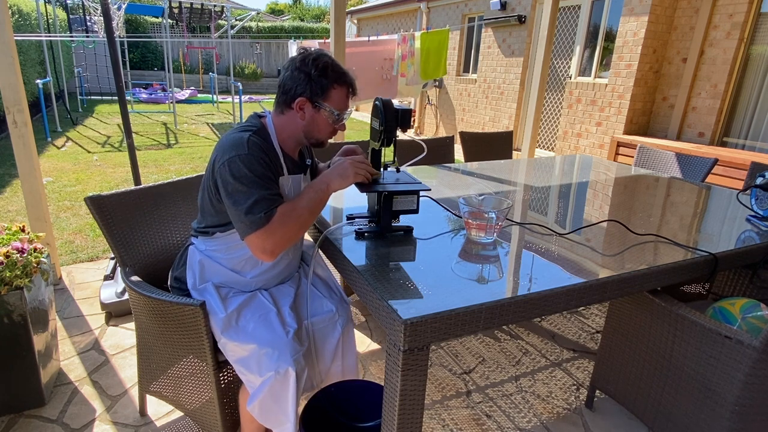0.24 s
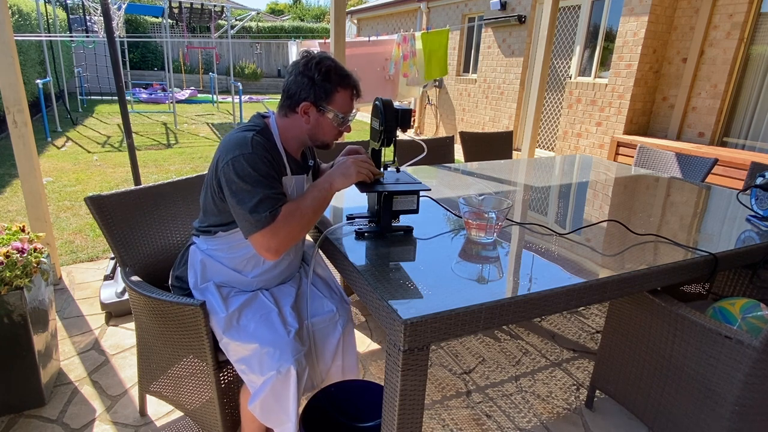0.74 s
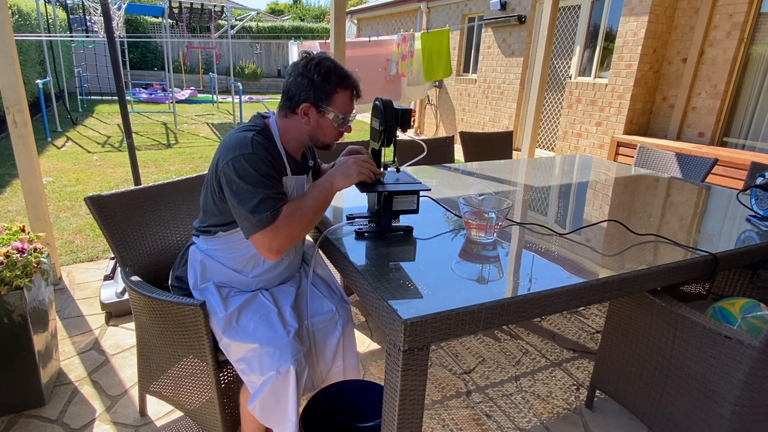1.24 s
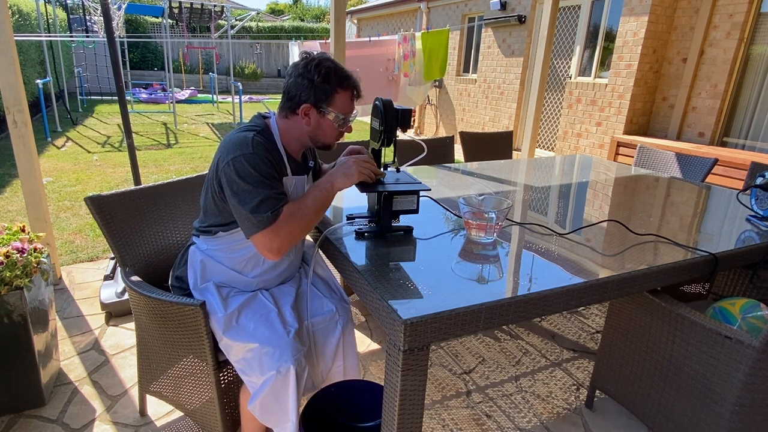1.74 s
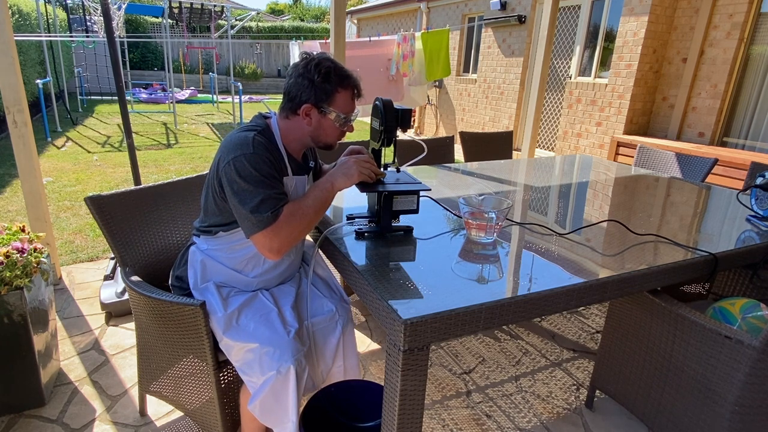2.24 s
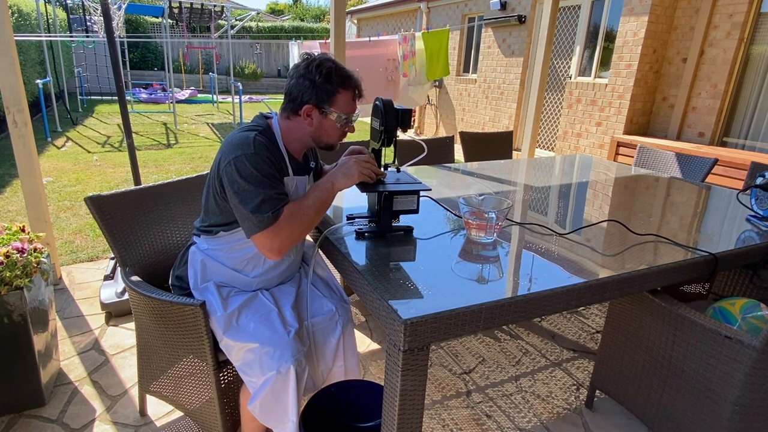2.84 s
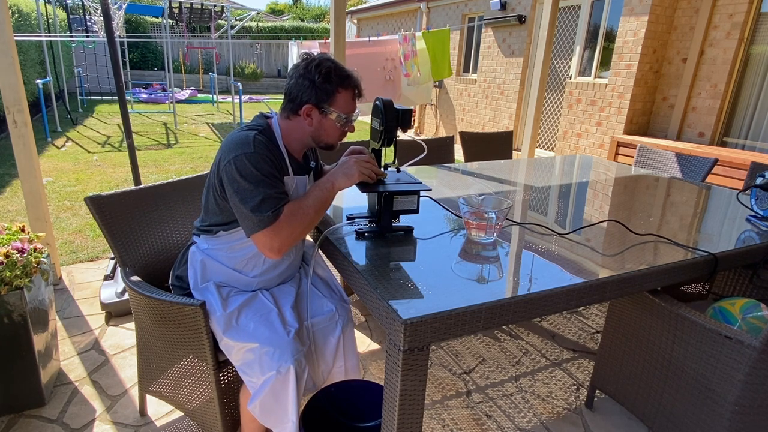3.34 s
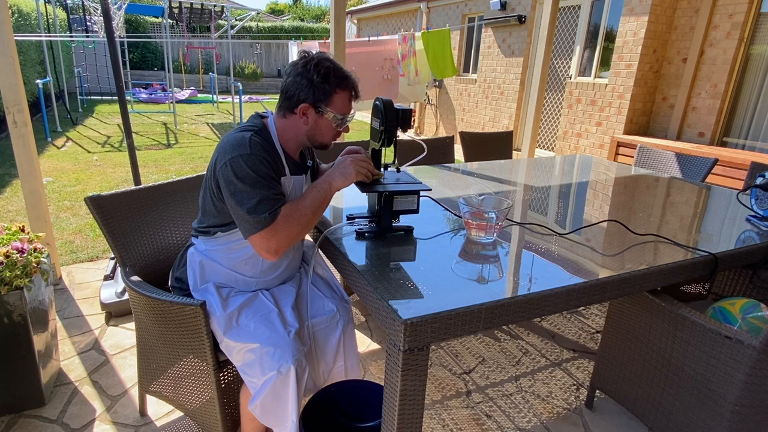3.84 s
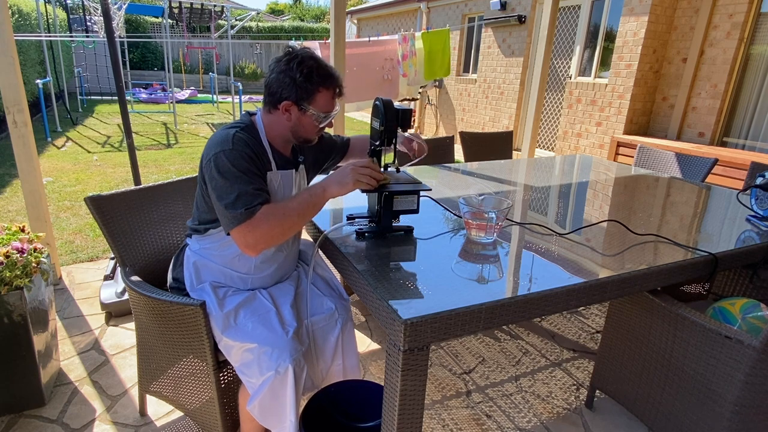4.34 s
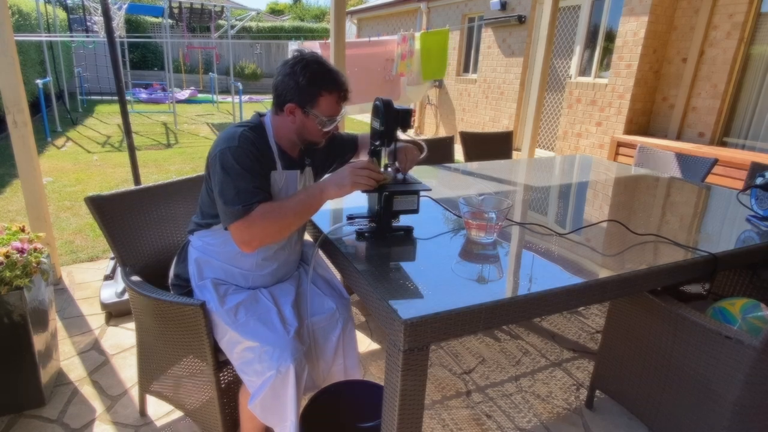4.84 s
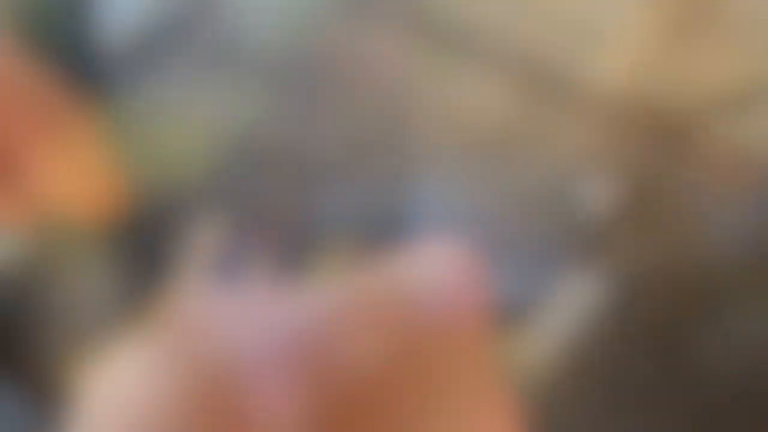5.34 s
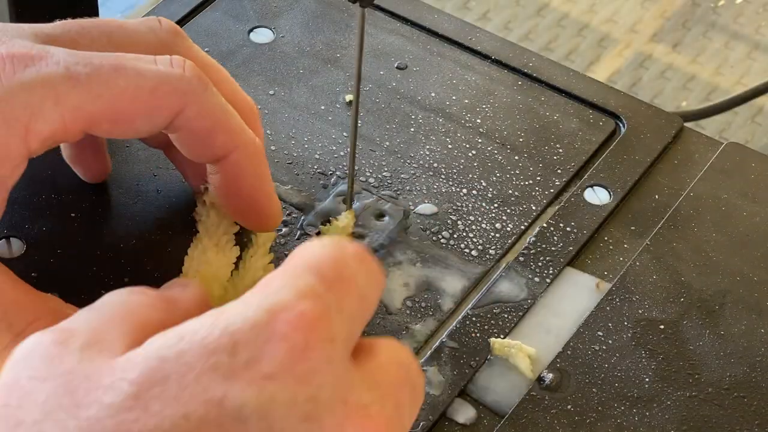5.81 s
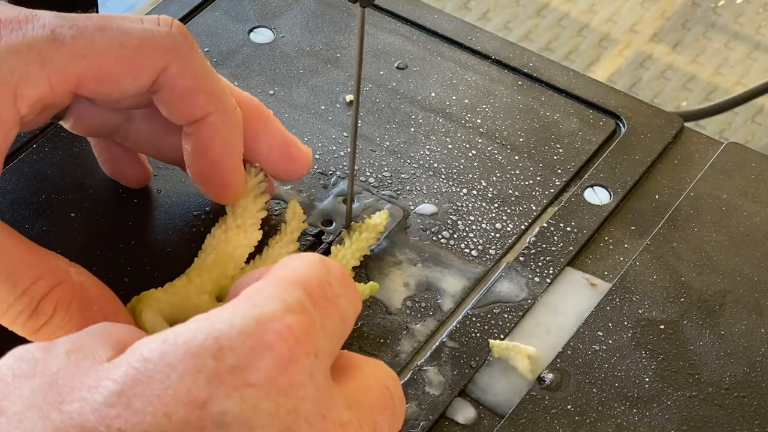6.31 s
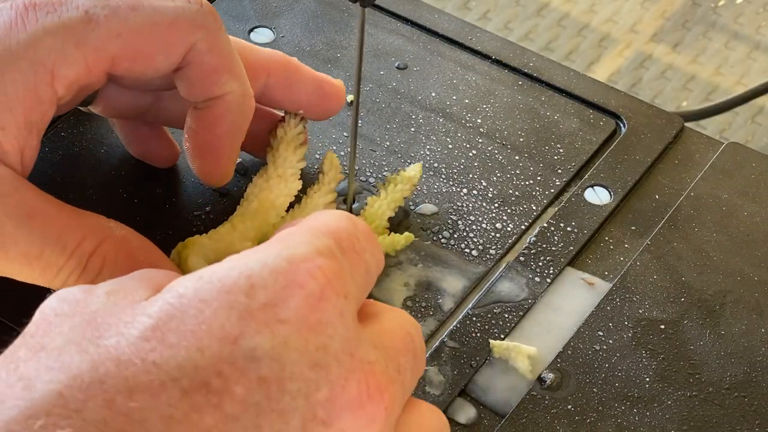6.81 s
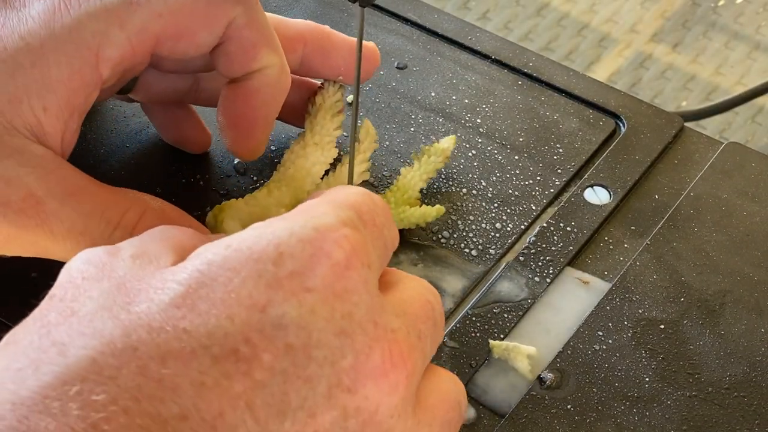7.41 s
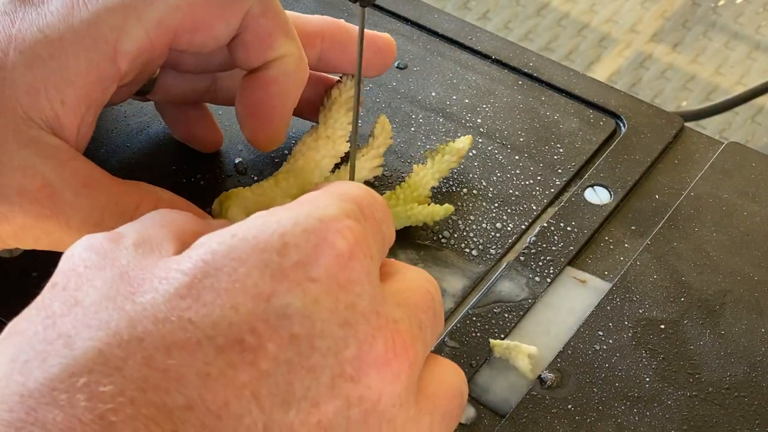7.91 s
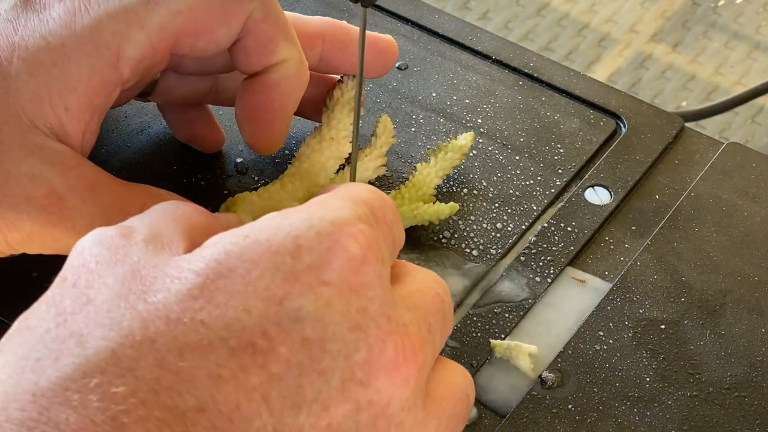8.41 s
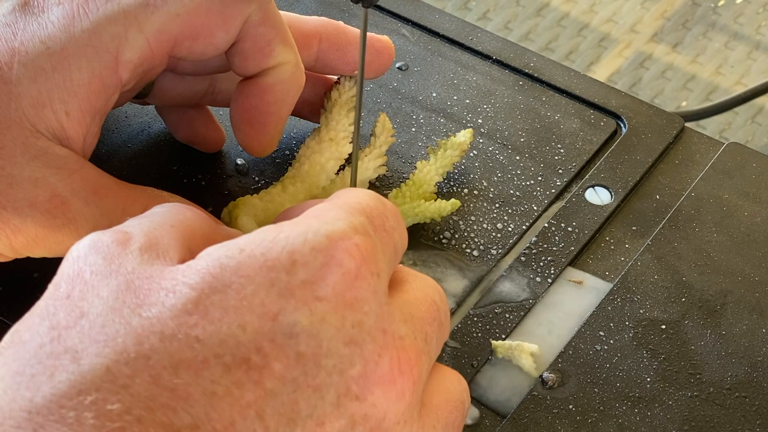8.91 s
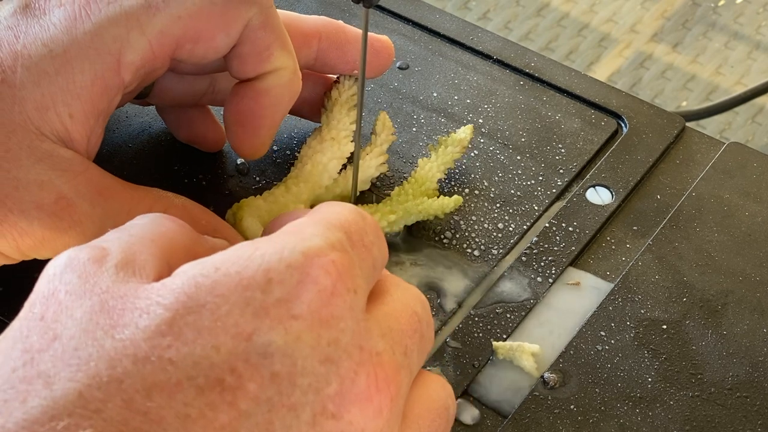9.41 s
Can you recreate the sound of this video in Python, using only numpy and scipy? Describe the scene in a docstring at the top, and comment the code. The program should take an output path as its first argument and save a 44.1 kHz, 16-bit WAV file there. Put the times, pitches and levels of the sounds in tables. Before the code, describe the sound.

On an outdoor patio, a small wet band saw runs with a pulsing, rattling drone. It bites into a branch of coral, grinding harder with a bright fizz and ringing steel, then runs free with scattered gritty ticks. The sound blends into a duller close-up of the same saw. Fingers bump the microphone softly, and a second cut builds, with rhythmic metallic pings and faint thin squeaks.

```python
"""A gritty, pulsing grind: a small wet band saw on a patio table cuts a branch of coral and runs free,
then, heard close up, starts a second cut. The blade loop laps about 11.5 times a second,
shaking the frame in the same way and scraping at the same places on every lap. Diamond grit
grinds the wet stone, steel rings, the motor hums underneath, and fingers bump the microphone."""
import sys
import numpy as np
from scipy import signal
from scipy.fft import rfft, irfft, next_fast_len
from scipy.io import wavfile
from scipy.ndimage import uniform_filter1d, map_coordinates

SR = 44100
rng = np.random.default_rng(int(sys.argv[2]) if len(sys.argv) > 2 else 0)


def bounce(signal):
    """Save signal as a 16-bit WAV file at the path given by the first command-line argument."""
    frames = np.transpose(np.atleast_2d(signal))
    limited = np.clip(frames, -1, 1)
    pcm = np.round(limited * 32767).astype(np.int16)
    wavfile.write(sys.argv[1], SR, pcm)


N = 426006
TIME = np.arange(N) / SR
FREE_S, FREE_FADE_S = 3.72, 0.45  # the branch has parted and the blade runs free
NEAR_S, NEAR_FADE_S = 5.334, 0.7  # the distant saw crossfades into the saw heard close up

# broad colour of the free-running saw: f/Hz, level/dB
FREE_SAW_COLOUR = [(200, -13), (290, -12), (350, -1), (600, -6), (1350, -3), (1750, 3.5), (2100, -18),
                   (3500, -10), (4500, -10), (6000, -16.5), (9000, -19), (11000, -30), (15500, -37)]
# its resonances: f/Hz, width/Hz, lift/dB
FREE_SAW_MODES = [(488, 126, 14), (725, 140, 7), (828, 130, 8.3), (1030, 110, 11.3), (1410, 60, 6),
                  (2320, 170, 9), (2870, 130, 6.5), (3140, 150, 10), (5540, 260, 5)]
# bumps on the microphone: t/s, relative level/dB, f/Hz
MIC_BUMPS = [(5.582, -25, 210), (5.931, -25.5, 220), (6.129, -29, 140), (6.274, -33, 150),
             (6.356, -19.5, 225), (6.386, -22, 175), (6.606, -28, 150), (6.652, -28, 180),
             (6.779, -28, 130), (6.83, -23.5, 125)]


def amp(db):
    """Decibels to gain."""
    return 10 ** (np.asarray(db) / 20)


def unit(x):
    """Scaled to rms 1."""
    return x / np.sqrt(np.mean(x ** 2) + 1e-20)


def wobble(rate):
    """A smooth random curve, rate knots a second."""
    return map_coordinates(rng.standard_normal(int(N * rate / SR) + 4), [TIME * rate], order=2)


def after(s, fade):
    """Rises from 0 to 1 around time s."""
    return np.clip((TIME - s) / fade + .5, 0, 1)


def swell(s, length):
    """Rises to 1 at time s and falls again."""
    return np.exp(-((TIME - s) / length) ** 2)


def band(x, lo_hz, hi_hz):
    """The part of x between two steep edges."""
    size = next_fast_len(N + 8192)
    hz = np.fft.rfftfreq(size, 1 / SR) + 1
    cut = np.sqrt((1 + (lo_hz / hz) ** 20) * (1 + (hz / hi_hz) ** 20))
    return irfft(rfft(x, size) / cut, size)[:N]


def ringing(colour, modes=(), size=8192):
    """Causal impulse response of a body with a broad colour and resonances."""
    hz = np.fft.rfftfreq(size, 1 / SR) + 1
    colour_hz, colour_db = np.transpose(colour)
    broad_db = np.interp(np.log(hz), np.log(colour_hz), colour_db)
    peaks_db = sum(lift / (1 + (2 * (hz - centre) / width) ** 2) for centre, width, lift in modes)
    cepstrum = irfft(np.log(amp(broad_db + peaks_db)))
    cepstrum[1:size // 2] *= 2  # fold to minimum phase
    cepstrum[size // 2 + 1:] = 0
    return irfft(np.exp(rfft(cepstrum)))


def through(x, response):
    """x played through an impulse response."""
    return signal.fftconvolve(x, response)[:N]


def grit(rate, scatter_db, wash):
    """Tiny impacts of uneven size, rate a second, on a wash of finer ones."""
    sizes = amp(scatter_db * np.clip(rng.standard_normal(N), -2, 2)) * rng.choice([-1, 1], N)
    impacts = unit(sizes * (rng.random(N) < rate / SR))
    return unit(impacts + wash * rng.standard_normal(N))


def struck(times, db, modes, t60, vary_db):
    """Steel struck at the given times; each blow shares itself anew among the modes."""
    t, sound = np.arange(SR // 10) / SR, np.zeros(N + SR)
    hz, mode_db = np.transpose(modes)[:, :, None]
    rings = amp(mode_db - 60 * t / t60) * (1 - np.exp(-t / .0012))
    scatter = rng.standard_normal((len(times), 2, len(modes), 1))
    for s, blow_db, (size, detune) in zip(times, db, scatter):
        tones = np.sin(2 * np.pi * (hz + 14 * detune) * t)
        sound[int(s * SR):][:len(t)] += (amp(blow_db + vary_db * size) * rings * tones).sum(0)
    return sound[:N]


def patio(x, wet_db, t60):
    """Table top, wall and roof add a short diffuse answer."""
    t = np.arange(SR // 3) / SR
    tail = rng.standard_normal(len(t)) * amp(-60 * t / t60) * (t > .003)
    return x + amp(wet_db) * through(x, tail / np.linalg.norm(tail))


def rumble(load, level_db, load_db, near_db, handled_db):
    """Low rumble of table and air, stronger under load and while the microphone is handled."""
    # rumble spectrum: f/Hz, level/dB
    colour = [(20, -28), (50, -17.5), (80, -12), (108, -4), (160, -10.5), (260, -6.5), (500, -25.5),
              (3000, -68)]
    handled = after(MIC_BUMPS[0][0], 0.7) - after(MIC_BUMPS[-1][0] + 0.21, 0.26)
    db = level_db + load_db * load + near_db * after(NEAR_S, NEAR_FADE_S) + handled_db * handled
    return amp(db) * unit(through(rng.standard_normal(N), ringing(colour)))


def handling(bump_db, rub_db):
    """Soft, dull thuds and rubs of fingers on the microphone body."""
    # finger slides: t/s, swell/s, relative level/dB
    slides = [(5.55, .05, -44), (6.825, .04, -36.5)]
    # their spectrum: f/Hz, level/dB
    colour = [(20, -16), (60, -7), (140, 1), (240, -6), (330, -10), (600, -46)]
    t, thuds = np.arange(SR // 8) / SR, np.zeros(N)
    decay = amp(-60 * t / .038) * (1 - np.exp(-t / .003))
    for s, db, hz in MIC_BUMPS:
        thuds[int(s * SR):][:len(t)] += amp(db) * decay * np.sin(2 * np.pi * hz * t)
    sliding = sum(amp(db) * swell(s, length) for s, length, db in slides)
    friction = unit(through(rng.standard_normal(N), ringing(colour)))
    return amp(bump_db) * band(thuds, 20, 340) + amp(rub_db) * sliding * friction


def motor(laps_per_s, whirr_db, near_db, hum_db):
    """A wavering whirr geared to the blade, and the fourth multiple of the mains."""
    turns_per_lap, hum_hz = 10.7, 199.2
    whirr = np.sin(2 * np.pi * np.cumsum(turns_per_lap * laps_per_s + 4 * wobble(14)) / SR)
    whirr *= amp(whirr_db + near_db * after(NEAR_S, NEAR_FADE_S) + 3.1 * wobble(6))
    return whirr + amp(hum_db + wobble(3)) * np.sin(2 * np.pi * hum_hz * TIME)


def crackle(level_db, start_s, end_s):
    """A brief, high, uneven crackle as the coral shifts on the wet table."""
    # broad colour of wet coral: f/Hz, level/dB
    colour = [(3500, -38), (5800, -3), (9000, -11), (15000, -11)]
    # its resonances: f/Hz, width/Hz, lift/dB
    modes = [(7000, 700, 8.2), (10100, 580, 6)]
    sputter = grit(rate=1500, scatter_db=4, wash=0.34) * amp(3.1 * wobble(130))
    ring = band(through(sputter, ringing(colour, modes)), 4500, 16000)
    return amp(level_db) * unit(ring) * (after(start_s, 0.01) - after(end_s, 0.034))


def chips(level_db, rate, scatter_db, t60, start_s, end_s):
    """The parted coral brushes the free blade and sheds small, bright ticks at random."""
    t = np.arange(SR // 10) / SR
    ticks = (rng.random(N) < rate / SR) * amp(scatter_db * np.clip(rng.standard_normal(N), -1.5, 1.5))
    envelope = through(ticks, amp(-60 * t / t60) * (1 - np.exp(-t / 0.0027)))
    brushing = after(start_s, .1) - after(end_s, 0.11)
    ring = through(rng.standard_normal(N), ringing(FREE_SAW_COLOUR, FREE_SAW_MODES))
    return amp(level_db) * envelope * brushing * unit(band(ring, 7200, 17000))


def squeals(gain_db, sputter_db):
    """The blade squeaks thinly and in sputters as it grazes the coral, and rasps as it sinks in."""
    # squeaks and rasps of the second cut: t/s, swell/s, f/Hz, width/Hz, relative level/dB
    squeaks = [(7.7, .08, 11330, 260, -62), (7.95, .07, 11400, 420, -54), (8.25, .25, 11400, 260, -60),
               (9.35, .3, 12500, 300, -58), (9.45, .2, 6250, 650, -44.5)]
    sound = np.zeros(N)
    for s, length, hz, width, db in squeaks:
        ring = signal.lfilter(*signal.iirpeak(hz, hz / width, SR), rng.standard_normal(N))
        sound += amp(db) * swell(s, length) * unit(ring)
    return amp(gain_db) * sound * unit(amp(sputter_db * wobble(45)))


def guide_pings(laps):
    """Heard close up, the loop strikes its guide at the same places on every lap."""
    # strikes: place/lap, relative level/dB
    strikes = [(.015, 0), (.595, -6), (.835, -4.5)]
    # their strength: t/s, level/dB
    strength = [(5.4, -46), (6.6, -41), (7.2, -33.5), (8.5, -29.5), (9.6, -29)]
    # modes of the guide: f/Hz, level/dB
    modes = [(2290, 0), (2390, -7), (3390, -14), (3760, -14)]
    places, place_db = np.transpose(strikes)
    times = np.interp(np.arange(int(laps[-1]) + 1)[:, None] + places, laps, TIME)
    db = np.interp(times, *np.transpose(strength)) + place_db
    return after(NEAR_S, NEAR_FADE_S) * struck(times.ravel(), db.ravel(), modes, t60=.045, vary_db=2.5)


def blade_ring(load, count, snap_db):
    """Grit snapping in the first cut keeps the taut blade ringing, louder under load."""
    # modes of the blade: f/Hz, level/dB
    modes = [(2915, -4), (3135, -1), (4008, 0), (4545, -5), (5660, -1), (6605, -1), (7455, -7), (9020, -8),
             (9965, -6)]
    times = rng.random(count) * FREE_S
    return (.15 + .85 * load) * struck(times, np.full(count, snap_db), modes, t60=.075, vary_db=4.5)


def tick_bursts(response, gain_db):
    """Short gritty bursts of ticks; close up, they are the louder knocks of the blade loop."""
    # bursts: t/s, relative level/dB
    bursts = [(3.3216, -14), (3.656, -23), (3.743, -18), (3.793, -16.5), (3.827, -22), (3.8577, -21),
              (3.9475, -17.5), (4, -17.5), (4.088, -19), (4.226, -16.5), (4.261, -20), (4.2944, -24),
              (4.4668, -19.5), (4.484, -21), (4.522, -18.5), (4.6405, -21), (4.695, -20.5), (4.723, -34),
              (4.785, -16), (4.815, -20.5), (4.9014, -26), (4.958, -24), (4.992, -22), (5.012, -18.5),
              (5.0465, -14), (5.275, -16.5), (5.308, -20), (7.083, -20), (7.333, -21), (8.457, -15),
              (8.552, -16), (9.1581, -24), (9.599, -20)]
    t60, rise_s = .062, .006
    envelope = sum(amp(db - 60 * np.abs(TIME - s) / t60) * after(s, rise_s) for s, db in bursts)
    chatter = grit(rate=1800, scatter_db=0, wash=0.68)
    return amp(gain_db) * through(envelope * chatter, response / np.linalg.norm(response))


def lap_noise(laps, repeat, size=4096):
    """Shaking of which a share comes back on every lap, because it is the shape of the loop."""
    loop = unit(irfft(np.exp(2j * np.pi * rng.random(size // 2 + 1))))
    looped = unit(np.interp(laps % 1 * size, np.arange(size), loop))
    share = np.clip(repeat, 0, 1)
    return np.sqrt(share) * looped + np.sqrt(1 - share) * rng.standard_normal(N)


def bite(laps, place, length):
    """Once a lap, a place on the loop bites fast and lets go slowly (0-1)."""
    away = ((laps - place + .5) % 1 - .5) / length + 0.22
    return np.exp(-(away / np.where(away < 0, .7, 1.2)) ** 2)


def scraping(laps, load, free, near):
    """Contact pressure in dB: rough places bite unevenly, and a free blade flutters more."""
    # rough places from afar: place/lap, length/laps, weight unloaded, weight loaded
    rough = [(.035, 0.1, 1, 2), (.09, 0.023, 4.5, -0.5), (.195, 0.033, 7, 5), (.315, 0.046, 2.5, 5),
             (0.421, 0.025, 5, 6.5), (.58, 0.13, 0, 4), (.74, 0.046, 3, 5), (0.823, 0.042, 5, 3.5),
             (.9, 0.072, 0.5, 6)]
    # close up, where each lap chugs and then eases: place/lap, length/laps, weight
    chugs = [(.04, .075, 4.2), (.22, .05, 1.8), (.44, .04, 1.8), (.62, .11, 2.8), (.845, .065, 4.4)]

    def touch(place, length):
        return (1 + 0.078 * wobble(12)) * bite(laps, place, length)

    flutter_db = (1 + 0.5 * free * (1 - near)) * (0.45 * wobble(30) + 0.99 * wobble(130))
    far = sum((idle + (loaded - idle) * load) * touch(place, length)
              for place, length, idle, loaded in rough)
    close = (1 - 0.64 * load) * sum(weight * touch(place, length) for place, length, weight in chugs)
    return (1.26 + 0.21 * near) * ((1 - near) * far + near * close) + flutter_db


def radiate(force, voices, lo_hz, hi_hz):
    """One band of a force sounding through the saw's changing voice, at a steady rms of 1."""
    force = band(force, lo_hz, hi_hz)
    sound = sum(np.sqrt(share) * unit(through(force, response)) for share, response in voices)
    return sound / np.sqrt(np.abs(uniform_filter1d(sound ** 2, SR // 3)) + 1e-9)


def frame_drone(laps, load, near, voices):
    """The frame sings at multiples of the lap rate; a loaded blade slips and blurs them."""
    # frame tones: multiple, far level/dB, close level/dB
    tones = [(31, -21, -7), (32, -12, -25), (35, -18, -13), (39, -11, -9), (40, -11, -8), (41, -6, -7),
             (42, -6, -5), (43, -2, 0), (45, 0, -25), (68, -22, -9.5)]
    song = np.zeros(N)
    for multiple, far_db, near_db in tones:
        slip = (0.025 + 0.085 * load) * wobble(14)
        db = far_db + (near_db - far_db) * near + 1.86 * wobble(9)
        song += amp(db) * np.sin(2 * np.pi * (multiple * laps + slip + rng.random()))
    song /= np.sqrt(uniform_filter1d(song ** 2, SR // 3))
    blur = radiate(rng.standard_normal(N), voices, 422, 547)
    clean = 0.14 + (0.57 + 0.17 * near) * (1 - load) ** 2
    return np.sqrt(clean) * song + np.sqrt(1 - clean) * blur


def table_boom(laps, load, voices):
    """Shaken by the loop, the table booms below the frame's main resonance."""
    return radiate(lap_noise(laps, repeat=0.74 * (1 - load)), voices, 258, 448)


def wheel_rattle(laps, load, near, pressure_db, voices):
    """The loop rattles the wheels; close up it knocks harder once a lap, perhaps at its joint."""
    joint_db = 2.5 * near * (1 - .5 * load) * bite(laps, place=.035, length=0.15)
    knocks = lap_noise(laps, repeat=.5 - 0.51 * load) + 0.73 * grit(rate=700, scatter_db=3.5, wash=0.15)
    knocks *= amp(0.62 * pressure_db + joint_db)
    return radiate(patio(knocks, wet_db=-9, t60=0.17), voices, 560, 1916)


def grinding(pressure_db):
    """Diamond grit strikes the wet stone, louder as the pressure rises."""
    return patio(grit(rate=5000, scatter_db=3, wash=0.97) * amp(pressure_db), wet_db=-13, t60=0.06)


def spray(contact, pressure_db, near):
    """Harder contact fizzes more brightly; close up an even mist of water fills the gaps."""
    fizz = unit(contact * amp(0.25 * (2 - near) * pressure_db))
    return fizz + 0.48 * near * rng.standard_normal(N)


def layer_gain(layer, load, free, near):
    """A layer's level follows the load; the distant sound fades out as the close one fades in."""
    # per layer: unloaded level/dB (first cut, free, close), change at full load/dB (far, close)
    levels = {"drone": (-28.5, -31, -34, -2.5, -6.5), "boom": (-42.5, -41.5, -44.5, 4, 10),
              "rattle": (-31.5, -31, -38.5, 2, 7), "grind": (-35.5, -36, -45.5, 6, 9),
              "fizz": (-43.5, -43, -56.5, 12.5, 14.5)}
    first_db, free_db, near_db, far_load_db, near_load_db = levels[layer]
    far = amp(first_db + (free_db - first_db) * free + far_load_db * load)
    return np.hypot((1 - near) * far, near * amp(near_db + near_load_db * load))


def saw(laps, load):
    """Shaking, grinding and ticks sound through the saw's body: cutting, running free, then close up."""
    # broad colour of the first cut and close up: f/Hz, level/dB
    cut_colour = [(200, -12), (290, -12), (350, -4), (600, -7), (1350, -1), (1750, -3), (2100, -13.5),
                  (2550, -14.5), (3500, -10.5), (4500, -10), (6000, -12), (9000, -13.5), (11000, -19.5),
                  (15500, -25.5)]
    close_colour = [(200, -7.5), (290, -12.5), (350, 5.5), (600, -7.5), (1350, -10.5), (1750, -21.5),
                    (2100, -20), (3500, -19.5), (4500, -30.5), (6000, -25), (8400, -28.5), (9300, -36),
                    (11000, -38), (15500, -39.5)]
    # their resonances and notches: f/Hz, width/Hz, lift/dB
    cut_modes = [(498, 68, 16.5), (730, 100, 6), (840, 93, 4.5), (1280, 110, 4.5), (2350, 120, 7.5),
                 (2760, 120, 7), (2915, 70, 8), (2995, 50, -6), (3140, 110, 10), (3390, 90, 5),
                 (3630, 110, 5), (3830, 130, 7), (4008, 70, 6.5), (4260, 80, 4.5), (5630, 440, 9.5),
                 (6620, 130, 7), (7230, 200, 6.5), (8950, 470, 5.5), (9945, 170, 6.5), (10400, 250, 3.5),
                 (13000, 450, 4), (14920, 500, 4.3)]
    close_modes = [(505, 75, 9.2), (585, 64, 4), (765, 120, 7.2), (1054, 60, 5.3), (1115, 80, -5),
                   (1300, 300, 5), (1870, 85, 7), (2280, 240, 7.5), (3760, 240, 4)]
    free, near = after(FREE_S, FREE_FADE_S), after(NEAR_S, NEAR_FADE_S)
    cut_voice, close_voice = ringing(cut_colour, cut_modes), ringing(close_colour, close_modes)
    free_voice = ringing(FREE_SAW_COLOUR, FREE_SAW_MODES)
    voices = [(1 - free, cut_voice), (free * (1 - near), free_voice), (near, close_voice)]
    pressure_db = scraping(laps, load, free, near)
    layers = {"drone": frame_drone(laps, load, near, voices),
              "boom": table_boom(laps, load, voices),
              "rattle": wheel_rattle(laps, load, near, pressure_db, voices)}
    contact = grinding(pressure_db)
    layers["grind"] = radiate(contact, voices, 1936, 6050)
    layers["fizz"] = radiate(spray(contact, pressure_db, near), voices, 6980, 16000)
    running = sum(layer_gain(name, load, free, near) * sound for name, sound in layers.items())
    ticks = (1 - near) * tick_bursts(cut_voice, gain_db=-4)
    ticks += near * band(tick_bursts(close_voice, gain_db=-4.5), 890, 4500)
    return running + band(ticks, 600, 17000)


def scene():
    """Saw, motor, ringing steel, coral, bumps and low rumble at one microphone on the patio."""
    # blade speed, sagging under load: t/s, lap rate/Hz
    speed = [(0.0, 11.57), (1.15, 11.67), (1.5, 11.18), (1.95, 10.61), (2.4, 11.53), (3.0, 11.37),
             (3.45, 11.87), (3.9, 11.56), (5.26, 11.36), (5.34, 11.87), (6.5, 11.99), (7.6, 12.02),
             (8.2, 11.25), (8.5, 10.65), (8.8, 11.8), (9.5, 11.33)]
    # how hard the coral is pressed against the blade: t/s, load (0-1)
    feed = [(0, 0.07), (1.2, 0.26), (1.33, 0.7), (1.85, 0.92), (2.65, 0.94), (3.53, 0.74), (3.65, 0),
            (6.7, 0.09), (7.84, 0.23), (7.92, 0.45), (9.2, 0.77), (9.47, 0.94)]
    laps_per_s, load = np.interp(TIME, *np.transpose(speed)), np.interp(TIME, *np.transpose(feed))
    laps = np.cumsum(laps_per_s) / SR
    machine = saw(laps, load) + motor(laps_per_s, whirr_db=-58, near_db=-9, hum_db=-60.5)
    coral = (chips(level_db=-33, rate=80, scatter_db=5, t60=0.022, start_s=4.2, end_s=5.33)
             + crackle(level_db=-46, start_s=5.7, end_s=5.83)
             + squeals(gain_db=1, sputter_db=5))
    low = (handling(bump_db=2, rub_db=-3.5)
           + rumble(load, level_db=-56.5, load_db=3, near_db=-1, handled_db=6.5))
    steel = guide_pings(laps) + blade_ring(load, count=260, snap_db=-39.8)
    return (machine + steel + coral + low)[None]


def record(dry):
    """The microphone passes nothing above 15.8 kHz."""
    size = next_fast_len(N + 8192)
    passband = np.fft.rfftfreq(size, 1 / SR) < 15800
    return irfft(rfft(dry, size) * passband, size)[:, :N]


dry = scene()
out = record(dry)
bounce(out)
```